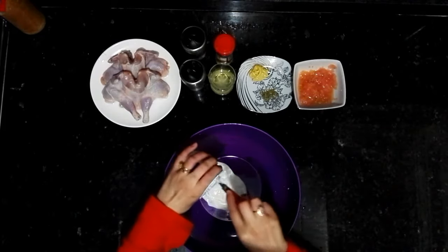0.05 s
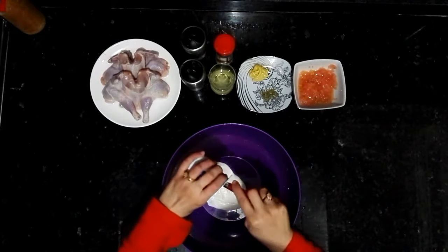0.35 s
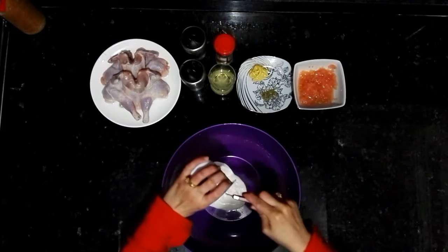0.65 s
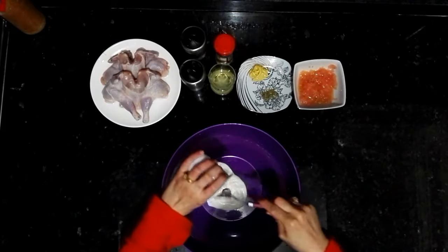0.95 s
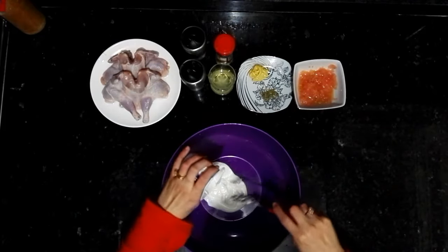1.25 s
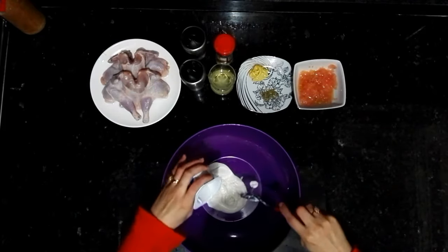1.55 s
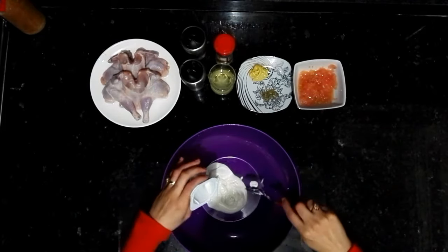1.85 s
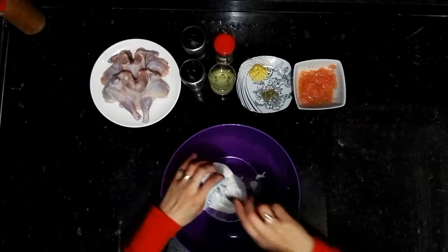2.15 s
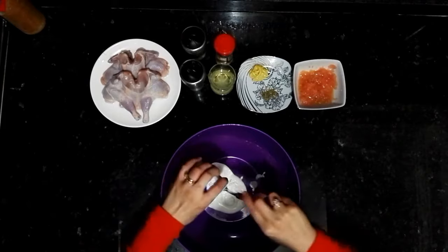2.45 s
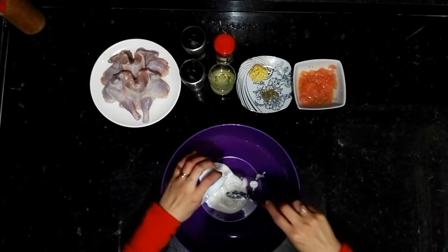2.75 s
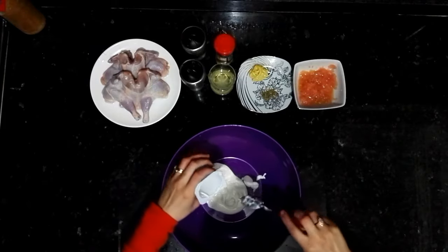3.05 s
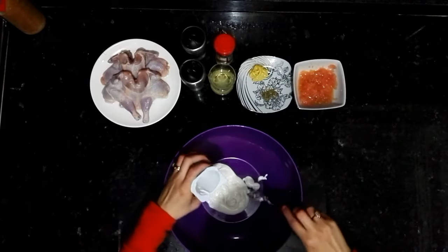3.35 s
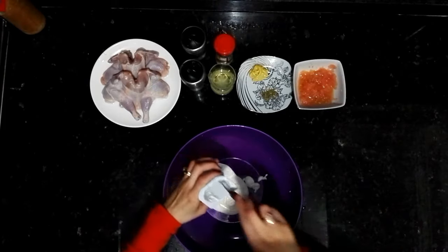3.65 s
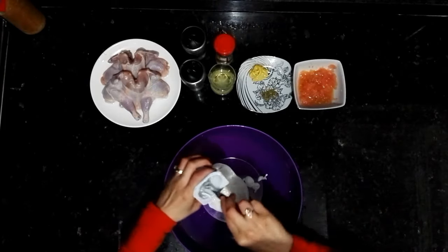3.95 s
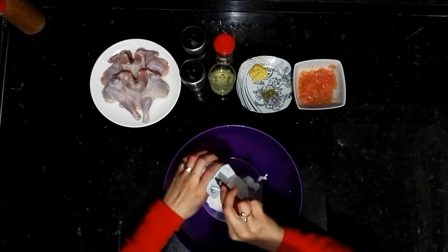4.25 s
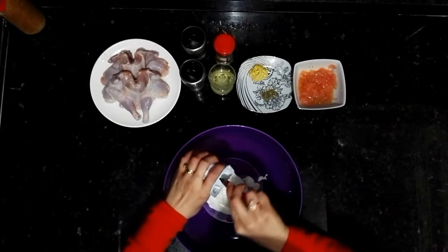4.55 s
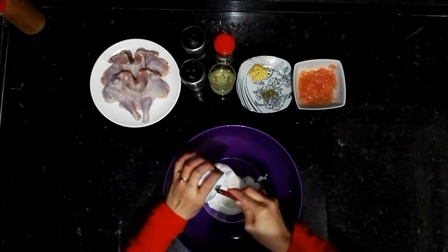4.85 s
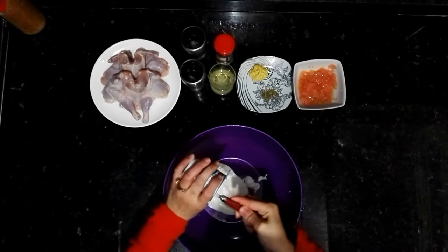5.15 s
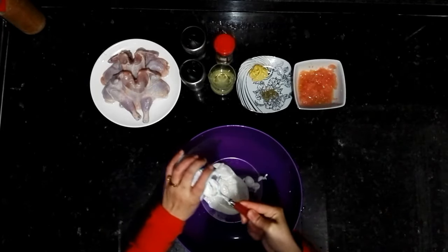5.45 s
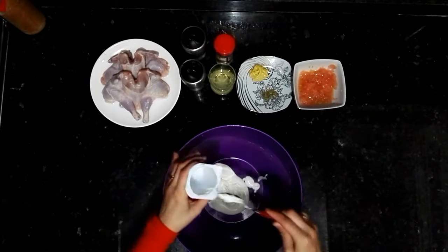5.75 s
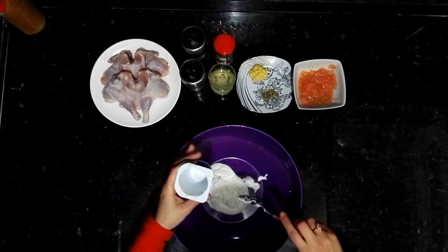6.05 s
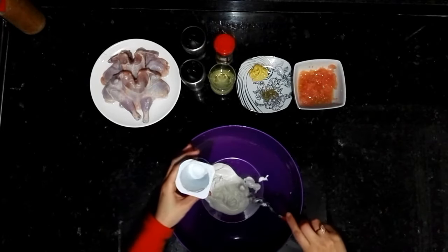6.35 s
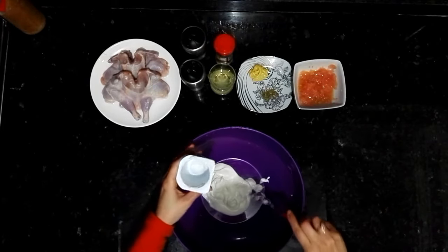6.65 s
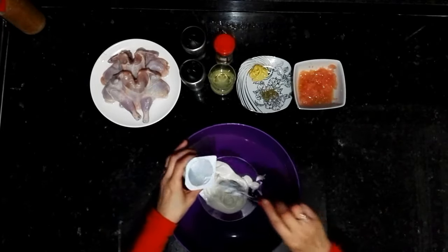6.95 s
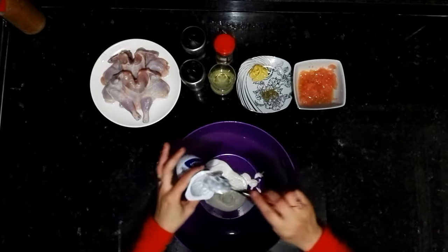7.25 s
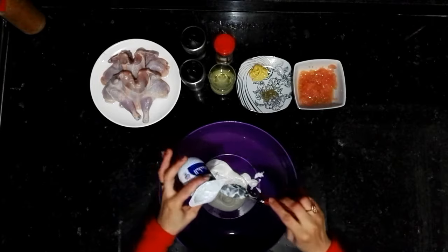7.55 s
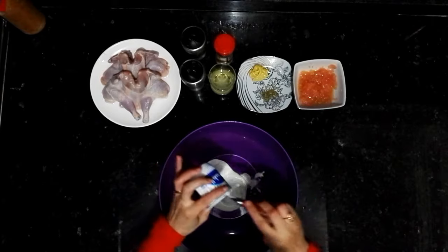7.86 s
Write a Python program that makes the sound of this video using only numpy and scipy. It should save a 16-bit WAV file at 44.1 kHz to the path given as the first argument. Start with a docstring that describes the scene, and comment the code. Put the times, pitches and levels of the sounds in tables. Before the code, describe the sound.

A metal spoon scrapes yogurt from a crackling plastic cup and knocks sharply against a plastic mixing bowl in a kitchen.

```python
"""Over faint hiss, rumble and drone, a metal spoon scrapes yogurt from a small plastic cup by stick-slip
friction. The cup's air pops at its resonance, and its thin wall buckles with a snap. Light knocks on a
plastic mixing bowl lead to two hard ones after 3 s, which ring the bowl's modes. More scraping follows,
then three hard knocks from 6.4 s clean the spoon, and a few last snaps and scrapes close the scene.
A bare kitchen reverberates throughout."""
import sys
import numpy as np
from scipy import signal
from scipy.fft import rfft, irfft, next_fast_len
from scipy.io import wavfile
from scipy.ndimage import uniform_filter1d

SR = 44100
rng = np.random.default_rng(int(sys.argv[2]) if len(sys.argv) > 2 else 0)


def persist_wave(psi):
    """Save psi, clipped to +-1, as 16-bit WAV."""
    counts = np.round(np.clip(psi, -1, 1) * 32767).astype(np.int16)
    wavfile.write(sys.argv[1], SR, np.atleast_2d(counts).T)


N = 349138
T = np.arange(SR // 4) / SR  # time axis of one short event, in seconds
TAP = np.eye(1, len(T))[0]  # unit impulse


def undb(db):
    """Decibels to amplitude gain."""
    return 10 ** (np.asarray(db) / 20)


def along(points, hz):
    """Interpolation of (Hz, value) rows on a log-frequency axis."""
    f, v = np.transpose(points)
    return np.interp(np.log(hz + 1), np.log(f), v)


def between(ends, share):
    """Linear interpolation between two ends as the share goes from 0 to 1."""
    return ends[0] + (ends[1] - ends[0]) * np.clip(share, 0, 1)


def unit(x):
    """Normalisation to rms 1."""
    return x / np.sqrt(np.mean(x ** 2))


def blow(x, db):
    """Normalisation to the energy of 5 ms at the given level."""
    return x * undb(db) * np.sqrt(.005 * SR / np.sum(x ** 2))


def add(track, s, x):
    """Superposition of x on the track at s seconds."""
    i = max(int(s * SR), 0)
    x = x[:max(len(track) - i, 0)]
    track[i:i + len(x)] += x


def shape(x, gain):
    """Linear filtering: the spectrum is multiplied by gain(f)."""
    n = x.shape[-1]
    size = next_fast_len(n + 2048)
    return irfft(rfft(x, size) * gain(np.fft.rfftfreq(size, 1 / SR)), size)[..., :n]


def colour(x, points):
    """Minimum-phase filtering by (Hz, dB) rows."""
    def response(f):
        cepstrum = irfft(np.log(undb(along(points, f))))
        cepstrum[1:len(f) - 1] *= 2
        cepstrum[len(f):] = 0
        return np.exp(rfft(cepstrum))
    return shape(x, response)


def resonance(f, hz, width):
    """Response of a damped oscillator, gain 1 at its centre."""
    return 1j * f * width / (hz ** 2 - f ** 2 + 1j * f * width)


def ring(x, modes, order=1):
    """Modal superposition: x drives (Hz, width, dB) modes; order 2 steepens their flanks."""
    return shape(x, lambda f: sum(undb(db) * resonance(f, hz, width) ** order for hz, width, db in modes))


# Each row: frequency in Hz, correlation between the two microphones.
COHERENCE = [(70, .97), (180, .82), (380, .45), (700, -.2), (1200, .3), (2400, -.1), (4000, 0)]

def diffuse(noise):
    """Diffuse-field coherence: two close microphones hear nearly the same bass but unlike treble."""
    mid = shape(noise[0], lambda f: np.sqrt((1 + along(COHERENCE, f)) / 2))
    side = shape(noise[1], lambda f: np.sqrt((1 - along(COHERENCE, f)) / 2))
    return np.array([mid + side, mid - side])


def swelling(rest_db, swells):
    """Amplitude envelope: Gaussian swells on a resting gain."""
    t = np.arange(N) / SR
    return undb(rest_db) + sum(undb(db) * np.exp(-((t - s) / width) ** 2) for s, width, db in swells)


# Each row: frequency in Hz, relative spectral density in dB.
HISS_SPECTRUM = [(20, -7.5), (60, -9), (150, -10.5), (260, -15), (700, -14.5), (2000, -14.5), (6000, -23.5),
                 (10000, -28.5), (14500, -29)]
# Each row: frequency in Hz, bandwidth in Hz, gain in dB.
DRONE_MODES = [(105.16, 1.1, 10.5), (140, 13, -0.5)]
# Each row: peak time in seconds, half width in seconds, level in dB.
RUMBLE_SWELLS = [(5.6, 0.42, -58)]
DRONE_SWELLS = [(1.199, 0.18, -76), (2.5, .08, -51), (5.03, 0.18, -64.5)]

def background(hiss_db, rumble_db, drone_db):
    """Filtered noise: broadband room hiss, a narrowband rumble through the walls and a low drone."""
    hiss = unit(shape(diffuse(rng.standard_normal((2, N))), lambda f: undb(along(HISS_SPECTRUM, f))))
    rumble = unit(shape(rng.standard_normal(N), lambda f: resonance(f, hz=30, width=5.1) ** 2))
    rumble *= swelling(rumble_db, RUMBLE_SWELLS)
    drone = unit(ring(rng.standard_normal(N), DRONE_MODES))
    drone *= swelling(drone_db, DRONE_SWELLS)
    return undb(hiss_db) * hiss + rumble + drone


def slips(size, spread_db):
    """Stick-slip excitation: dense clicks, mostly small, a few large."""
    clicks = rng.standard_normal(size)
    strength_db = spread_db * np.minimum(rng.exponential(size=size), 5)
    return unit(clicks * undb(strength_db))


def plastic(x, hz, fizz_db, q):
    """Forced vibration of thin plastic: a wall resonance and a broad fizz above it."""
    wall = shape(x, lambda f: resonance(f, hz, hz / q) ** 2)
    fizz = shape(x, lambda f: resonance(f, hz=14020, width=15000) ** 2)
    return unit(wall) + undb(fizz_db) * unit(fizz)


# Modes of the cup's air and wall. Each row: frequency in Hz, bandwidth in Hz, gain in dB.
AIR_MODES = [(357, 180, -18), (583, 99, -19.5), (992, 110, -3), (1070, 100, 6), (3000, 1500, -26)]
WALL_MODES = [(1880, 500, -4), (2170, 560, 0), (3200, 700, -9)]
# Each row: start in seconds, length in seconds, level in dB, flex from 0 (stiff rim) to 1 (soft wall),
# grit in relative dB.
SPOON_STROKES = [(0, 0.067, -45, 0.6, -3.5), (0.146, .079, -49, .4, -3.5), (0.367, 0.13, -65, 0.2, -2),
                 (0.609, .11, -60.5, 0.2, -16), (0.814, 0.25, -64.5, .1, -12.5), (2.289, 0.2, -53, 1, -3),
                 (2.424, 0.28, -58, 0.42, -7.5), (2.672, 0.049, -50, .85, -12.5),
                 (3.112, 0.088, -67.5, 0, -5), (3.592, 0.058, -43, 0.74, -8),
                 (3.722, 0.19, -51, 0.53, -2.5), (3.922, 0.034, -37, 0.03, -8.5),
                 (4.256, 0.13, -52, 0.79, -4), (4.506, 0.024, -31, 0.38, -12),
                 (4.769, 0.23, -51, 0.5, -3.5), (4.887, .17, -51.5, 0.96, -31.5),
                 (5.026, 0.098, -55, 0, -6.5), (5.418, 0.22, -60, 0.16, -9), (5.661, .19, -68.5, 0.7, -2.5),
                 (5.867, 0.25, -73, .98, -7.5), (7.537, 0.099, -44.5, 0.58, -5),
                 (7.759, 0.23, -61.5, 0.5, -21)]

def scrapes():
    """Stick-slip friction rasps and drives the cup's modes: more air at the rim, more wall where soft."""
    out = np.zeros(N)
    rasp_hz, air_db, wall_db = (4770, 2980), (-5.5, -11), (-27.5, -2)  # each from rim to soft wall
    for s, length, db, flex, grit_db in SPOON_STROKES:
        size = int(length * SR)
        pressure = unit(uniform_filter1d(rng.standard_normal(size), 300, mode="wrap"))
        drag = slips(size, spread_db=1.5) * undb(1.8 * pressure)
        air = unit(ring(drag, AIR_MODES, order=2)) * undb(between(air_db, flex))
        wall = unit(ring(drag, WALL_MODES, order=2)) * undb(between(wall_db, flex))
        # a dry, gritty stroke is broadband; a wet one keeps to a narrow rasp
        rasp = plastic(drag, between(rasp_hz, flex), grit_db, q=0.37 * undb(-.55 * grit_db))
        add(out, s, (rasp + air + wall) * signal.windows.tukey(size, .6) * undb(db))
    return out


def burst(decay_s):
    """Broadband transient: a decaying flurry of clicks with a whitened spectrum."""
    spectrum = rfft(slips(len(T), spread_db=5.0) * np.exp(-T / decay_s))
    return irfft(spectrum / np.abs(spectrum), len(T)) * np.exp(-T / (2 * decay_s))


def cup_tap(modes, db, rub_s, rub_db):
    """Impulsive excitation: a tap and a brief rub drive one set of the cup's modes."""
    rub = blow(burst(rub_s), rub_db) * np.sqrt(rub_s / 0.018)
    return blow(ring(blow(TAP, 0) + rub, modes, order=2), db)


def crackle(db, decay_s, hz, fizz_db):
    """Transient response of plastic to a burst of clicks; less fizz goes with a narrower resonance."""
    return blow(plastic(burst(decay_s), hz, fizz_db, q=0.29 * undb(-.65 * fizz_db)), db)


# Each row: start in seconds, level in dB, decay time of the rub in seconds.
AIR_POPS = [(.007, -24.5, 0.0035), (.247, -20, 0.0048), (1.03, -50.5, 0.0044), (2.312, -29, 0.052),
            (2.698, -43, 0.017), (3.629, -33, 0.0059), (3.794, -38, 0.0055), (4.156, -32, 0.003),
            (4.465, -44.5, 0.043), (4.5187, -28, 0.015), (4.791, -47, .02), (5.062, -51, 0.017),
            (7.274, -42.5, 0.0056), (7.54, -35, 0.0097)]

def pops(detune):
    """Cavity resonance: the cup's air pops at a varying pitch; a longer rub crackles more."""
    out = np.zeros(N)
    for s, db, rub_s in AIR_POPS:
        pitch = 1 + detune * rng.standard_normal()
        modes = [(hz * pitch, width, mode_db) for hz, width, mode_db in AIR_MODES]
        add(out, s, cup_tap(modes, db, rub_s, rub_db=-5.5))
        rub_gain = np.sqrt(rub_s / .01)  # energy grows in proportion to the rub's duration
        add(out, s, rub_gain * crackle(db - 11, rub_s, hz=3670, fizz_db=-7.5))
    return out


# Each row: start in seconds, level in dB, flex from 0 (stiff rim) to 1 (soft wall), fizz in relative dB.
WALL_SNAPS = [(.147, -39, 0.76, -7), (1.032, -54, 0.75, -8), (1.451, -56.5, .02, -13.5),
              (1.554, -43, 0.7, -4), (1.621, -38.5, 0.97, -5.5), (1.652, -43, .98, -11),
              (2.026, -32.5, 0.56, -23.5), (2.25, -43, 1, -18), (2.257, -28, .78, -0.5),
              (2.416, -41, 0.79, -10), (3.601, -35, 0.26, -14), (3.784, -39, 0.63, -17),
              (3.864, -38.5, 0.57, -9.5), (3.948, -34.5, 0.24, -10.5), (4.078, -37.5, 0.52, -9.5),
              (4.244, -49.5, 1, -7), (4.301, -40.5, 0.84, -11), (4.520, -19.5, 0.45, -12),
              (5.427, -48.5, 0.48, -7), (5.625, -47.5, 0.79, -6), (7.474, -33, 0.51, -16.5),
              (7.623, -39, .1, -14), (7.745, -43.5, 0.81, -5), (7.843, -43, 0.79, 33)]

def snaps(decay_s, rub_s):
    """Buckling jolts the cup's wall and air: a softer spot crackles lower and ticks louder."""
    out = np.zeros(N)
    crackle_hz, tick_db = (6020, 3180), (-37, 10.5)  # each from rim to soft wall
    for s, db, flex, fizz_db in WALL_SNAPS:
        add(out, s, crackle(db, decay_s, between(crackle_hz, flex), fizz_db))
        add(out, s, cup_tap(WALL_MODES, db + between(tick_db, flex), rub_s, rub_db=3.5))
        add(out, s, cup_tap(AIR_MODES, db - 14, rub_s, rub_db=-25.0))
    return out


# Each row: frequency in Hz, bandwidth in Hz, gain in dB.
BOWL_MODES = [(117, 36, -33.5), (178, 78, -10.5), (280, 13, -2.5), (356.7, 22, 5), (387.4, 34.5, 7),
              (509.2, 52, 8.5), (541, 7.6, 0.5), (631, 25, -3), (613, 9, -8), (787, 33, 9.5),
              (1014, 72, -8), (1106, 97, 13.5), (1170, 40, -4), (1244, 35, 2), (1385, 26, 9),
              (1547, 47, 8.5), (1630, 45, 5), (1704, 70, 3.5), (1910, 130, 0.5), (1950, 220, -14)]
# Each row: frequency in Hz, gain of the contact crack in dB.
CRACK_SPECTRUM = [(50, -30), (120, -3.5), (220, -14), (400, 0), (1000, -0.5), (2000, -1), (3100, -1.5),
                  (4300, -6.5), (6000, -11), (8000, -21), (10500, -27.5), (14000, -22)]
# Each row: start in seconds, level in dB, bass in dB relative to that level.
BOWL_KNOCKS = [(.249, -47.5, 7), (1.371, -66.5, 8.5), (1.5528, -47.5, 17.5), (1.61, -30.5, -5),
               (1.623, -34, 15), (1.655, -32.5, 2.5), (1.8898, -29, 1), (1.907, -26, 6.5), (2.697, -55, 2),
               (3.2348, -20, -4), (3.3813, -13, -6), (3.789, -53, 9.5), (4.522, -41, 0), (6.4017, -13, -1),
               (6.604, -15.5, -5.5), (6.769, -12.5, -4.5), (7.473, -47, 4), (7.601, -43.5, -3.5)]

def bowl(spread_db, detune, contact_s, crack_s):
    """Impact excitation: each knock and its rebound crack at the contact and ring the bowl's modes."""
    out = np.zeros(N)
    force = T * np.exp(-T / contact_s)
    split_hz, rebound_s, rebound_db, rebound_bass_db = 700, .05, -15, 6
    rebounds = [(s + rebound_s, db + rebound_db, rebound_bass_db) for s, db, _ in BOWL_KNOCKS]
    for s, db, bass_db in BOWL_KNOCKS + rebounds:
        # every blow lands on another spot and loads the wall differently
        modes = [(hz * (1 + detune * rng.standard_normal()), width,
                  mode_db + spread_db * rng.standard_normal()) for hz, width, mode_db in BOWL_MODES]
        low = blow(ring(force, [m for m in modes if m[0] < split_hz]), db + bass_db)
        high = blow(ring(force, [m for m in modes if m[0] >= split_hz]), db)
        crack = blow(colour(burst(crack_s), CRACK_SPECTRUM), db - 3.5 + 0.1 * bass_db)
        add(out, s, low - high + crack)
    return out


# Each row: frequency in Hz, amplitude in dB relative to the knock.
SPOON_MODES = [(2385, -37.5), (3182, -45)]

def spoon(t60_s):
    """Damped free vibration: the metal spoon rings faintly after each knock."""
    out, t = np.zeros(N), np.arange(SR) / SR
    tone = sum(undb(db) * np.sin(2 * np.pi * hz * t) for hz, db in SPOON_MODES)
    tone *= np.exp(-np.log(1000) * t / t60_s)
    for s, db, _ in BOWL_KNOCKS:
        add(out, s, undb(db) * tone)
    return out


def scatter(x, spread_s):
    """Multiple reflection inside the bowl gives each frequency a small group delay."""
    def response(f):
        knots_hz = np.arange(0, SR / 2, 250)
        delay = np.interp(f, knots_hz, rng.uniform(0, spread_s, len(knots_hz)))
        return np.exp(-2j * np.pi * np.cumsum(delay) * f[1])
    return shape(x, response)


# Each row: frequency in Hz, reverberation time in seconds.
ECHO_T60 = [(100, 0.39), (350, 0.4864), (1000, 0.4561), (2500, 0.545), (6000, 0.4444), (14000, 0.4356)]
# Each row: frequency in Hz, gain in dB.
ECHO_COLOUR = [(100, -1.5), (1000, 1), (4000, -0.92), (14000, 0.19)]

def reverberation(echo_db, build_s):
    """A diffuse field builds up, then decays exponentially at each band's own rate."""
    t = np.arange(SR) / SR
    noise = rng.standard_normal((2, SR))
    # many overlapping room modes share the energy evenly over frequency
    power = uniform_filter1d(np.abs(rfft(noise * np.exp(-12 * t))) ** 2, 30)
    field = diffuse(unit(irfft(rfft(noise) / np.sqrt(power), SR)))
    tail = 0
    for centre_hz, t60 in ECHO_T60:
        weights = [(hz, hz == centre_hz) for hz, _ in ECHO_T60]
        band = shape(field, lambda f: along(weights, f) * undb(along(ECHO_COLOUR, f)))
        tail += band * np.exp(-np.log(1000) * t / t60)
    return tail * (1 - np.exp(-t / build_s)) * undb(echo_db)


# Each row: delay in seconds, left gain, right gain.
EARLY_REFLECTIONS = [(.0022, 0.15, 0.38), (.0082, 0.27, 0.088), (0.0101, 0.5, 0.23), (0.0158, 0.19, 0.34)]
# The left microphone's direct path around the recorder's body, and its overall treble shading.
# Each row: frequency in Hz, gain in dB.
LEFT_DIFFRACTION = [(200, -13), (500, 4.5), (1100, -17), (3000, -22), (12000, -15)]
LEFT_SHADOW = [(200, 2), (700, -4), (2400, 3), (4400, -1.5), (8000, -2), (11000, -8.5), (14000, -16)]

def kitchen(x):
    """Convolution with the room response: direct sound from the right, reflections, reverberation."""
    response = reverberation(echo_db=-28, build_s=.005)
    lag = 26  # samples by which the left microphone hears it later
    add(response[0], lag / SR, colour(TAP, LEFT_DIFFRACTION))
    response[1, 0] += 1
    for s, left, right in EARLY_REFLECTIONS:
        response[0, int(s * SR) + lag] += left
        response[1, int(s * SR)] += right
    left, right = signal.fftconvolve(x[None], response, axes=1)[:, :N]
    return np.array([shape(left, lambda f: undb(along(LEFT_SHADOW, f))), right])


def scene():
    """Superposition: bowl, spoon and cup radiate from one spot on the counter into the room."""
    knocks = bowl(spread_db=2, detune=.01, contact_s=.00005, crack_s=.0016)
    cup = pops(detune=0.011) + snaps(decay_s=0.006, rub_s=0.0085) + scrapes()
    sources = scatter(knocks + spoon(t60_s=0.49) + cup, spread_s=.0016)
    return kitchen(sources) + background(hiss_db=-69.5, rumble_db=-72.5, drone_db=-74.5)


def record(dry):
    """Soft saturation rounds the hardest peaks, and a steep low-pass filter cuts the top."""
    ceiling, top_hz = .8, 14450
    lowpass = signal.ellip(12, .2, 70, top_hz, fs=SR, output="sos")
    return signal.sosfilt(lowpass, ceiling * np.tanh(dry / ceiling))


dry = scene()
out = record(dry)
persist_wave(out)
```